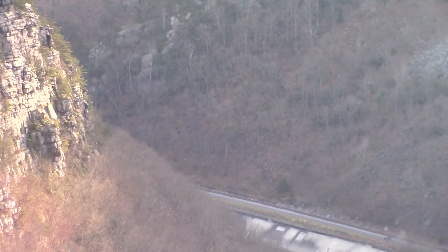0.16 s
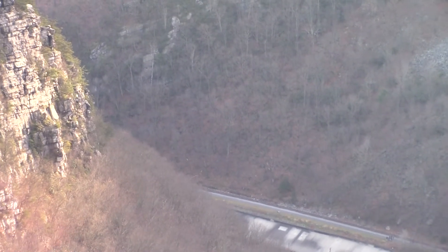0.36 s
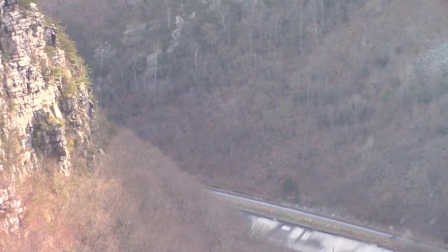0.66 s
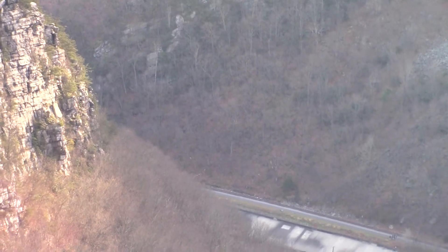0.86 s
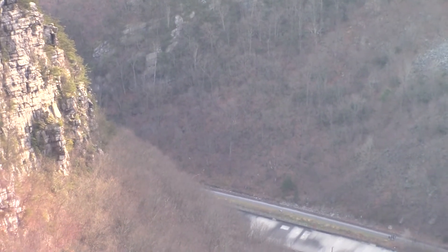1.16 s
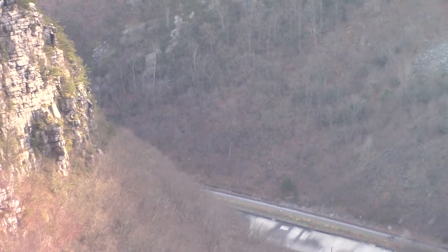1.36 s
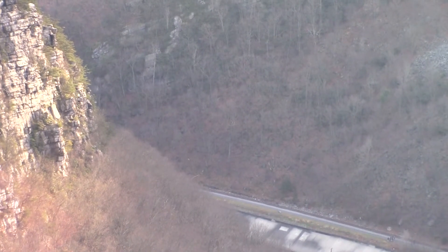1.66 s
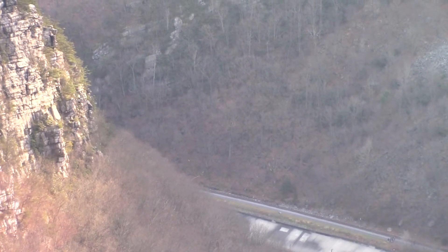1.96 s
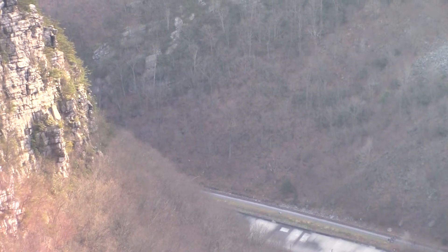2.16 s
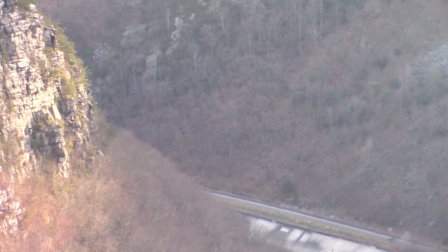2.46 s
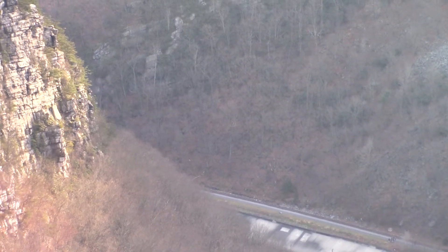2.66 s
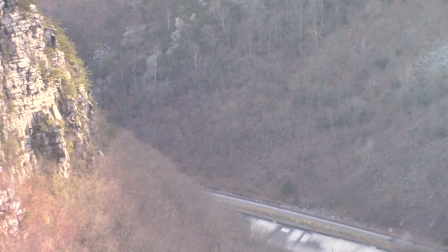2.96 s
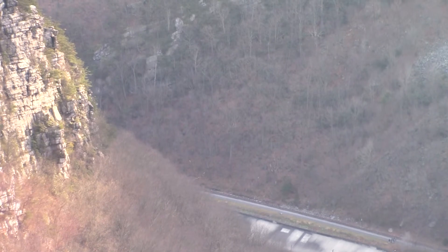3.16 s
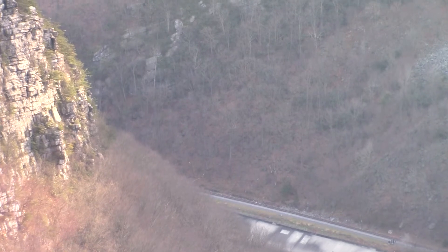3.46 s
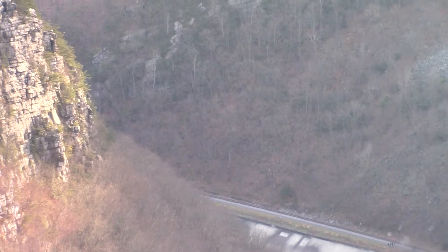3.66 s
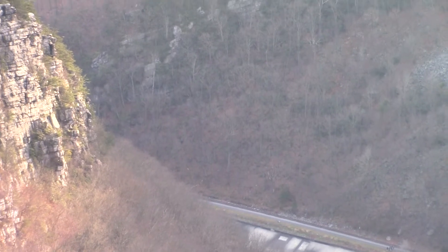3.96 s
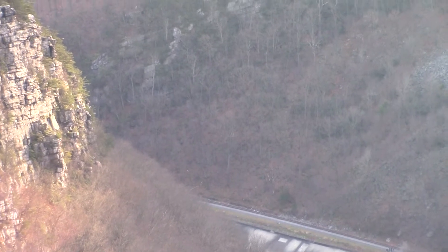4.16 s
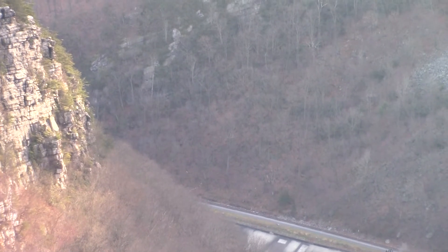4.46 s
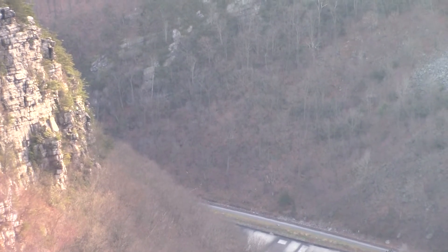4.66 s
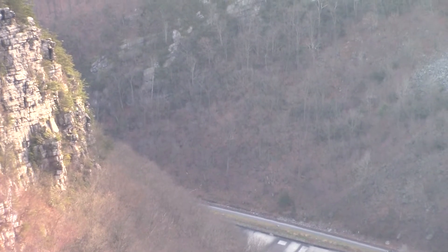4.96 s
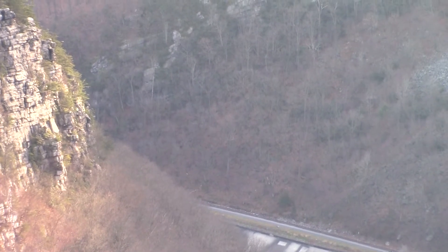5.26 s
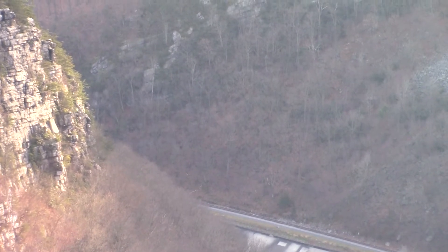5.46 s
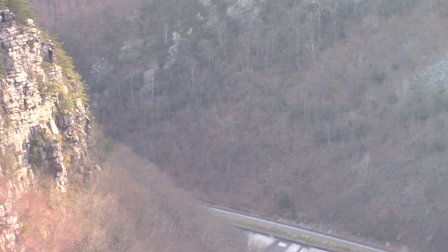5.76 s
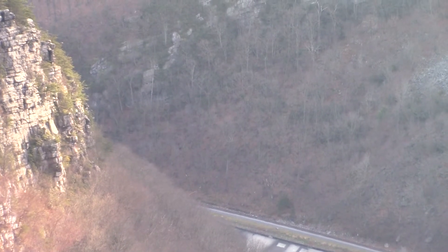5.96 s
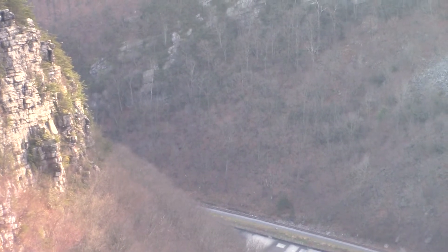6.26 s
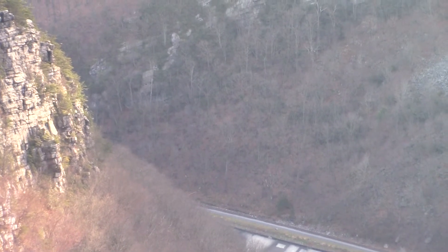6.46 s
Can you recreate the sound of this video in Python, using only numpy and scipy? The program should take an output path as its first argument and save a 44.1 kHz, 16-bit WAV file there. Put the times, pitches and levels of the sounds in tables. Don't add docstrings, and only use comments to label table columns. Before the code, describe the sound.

A steam locomotive whistle heard from far across a deep wooded valley. Low, broad river and traffic roar is present from the start, with faint preamp hiss and a very thin high whine. At about 0.1 s the whistle enters faintly on a low-mid note, climbs quickly from 0.6 to 1.3 s, and holds a full, hollow, mostly pure hoot with weak overtones, flickering as air moves. Deep wind thumps strike the microphone mainly from 1.9 to 2.6 s. The pitch sags from 3.4 s and the blast stops near 3.9 s. Late echoes at the higher pitch and a blurred reverberant haze carry through the gap, with a slight distant engine drone swelling near 4.2 s. At 4.9 s a second blast starts abruptly, glides up within half a second, and sustains, wavering, to the end at about 6.6 s, still sounding.

```python
import sys
import numpy as np
from scipy import signal
from scipy.fft import rfft, irfft, next_fast_len
from scipy.io import wavfile
from scipy.ndimage import uniform_filter1d, map_coordinates

SR = 44100
rng = np.random.default_rng(int(sys.argv[2]) if len(sys.argv) > 2 else 0)


def field_ratio(decibels):
    return 10 ** (np.asarray(decibels, dtype=float) / 20)


def waveform_to_disk(signal):
    frames = np.transpose(np.atleast_2d(signal))
    scaled = np.clip(frames, -1, 1) * 32767
    samples = np.round(scaled).astype(np.int16)
    wavfile.write(sys.argv[1], SR, samples)


N = 291940

# [t/s, pitch f/Hz, steam pressure level/dB]
FIRST_BLAST = [(0.12, 286, -23), (0.26, 292.5, -13.5), (0.58, 292, -14.5), (0.8, 316.6, -6),
               (1.25, 330.1, -1.5), (2.1, 342.3, 0.5), (2.9, 342.1, 0), (3.46, 331.7, -2),
               (3.79, 304.8, -10)]
SECOND_BLAST = [(4.91, 292.5, -19), (4.95, 299.2, -7.5), (5.0, 302.4, -7.5), (5.03, 321.8, -7),
                (5.36, 328.7, -1.5), (5.6, 333.9, -0.5), (5.801, 342.5, -1.5), (6.199, 341.7, -3),
                (6.61, 345, 1)]


def whistle(rows, wobble, scatter, dull_db, fade_s):
    # [multiple, level at full pressure/dB, pressure sensitivity/(dB/dB), twinkle/dB]
    pipe_partials = [(1, -18, 0.95, 0), (2, -36.5, 1.1, 2.5), (3, -33, 0.9, 2.5), (4, -41.5, 1.2, 2.1),
                     (5, -41, 0.99, 1.6), (6, -47.5, 0.87, 1.7), (7, -60, 0.37, 1.2), (8, -66.5, 0.3, 1),
                     (9, -76.5, .6, 2.7)]
    t = np.arange(N) / SR
    start_s, end_s = rows[0][0], rows[-1][0] + fade_s
    gate = np.clip(np.minimum(t - start_s, end_s - t) / fade_s, 0, 1)
    sounding = gate > 0
    size = np.sum(sounding)
    pitch_hz, pressure_db = (c[sounding] for c in in_time(rows))
    phase = 2 * np.pi * np.cumsum(pitch_hz * (1 + wobble * drift(13.1, size))) / SR
    partials = {}
    for k, full_db, follows, twinkle_db in pipe_partials:
        db = full_db + dull_db * np.log2(k) + follows * pressure_db + twinkle_db * drift(9.1, size)
        share = scatter * np.log(k)
        in_step = (1 + share * drift(17.2, size)) * np.sin(k * phase)
        out_of_step = share * drift(16, size) * np.cos(k * phase)
        wave = (in_step + out_of_step) / np.sqrt(0.5 + share ** 2)
        partials[k] = np.zeros(N)
        partials[k][sounding] = gate[sounding] * field_ratio(db) * wave
    return partials


def slope_echoes():
    # [t/s, pitch f/Hz, strength level/dB]
    echo_curve = [(3.3, 344.5, -7.5), (3.55, 348.9, -3.5), (3.9, 346.9, -2), (4.06, 343.7, -2),
                  (4.2, 338, -5), (4.42, 343.2, -7.5), (4.6, 336, -17.5), (4.95, 341.4, -11.5),
                  (5.4, 337.4, -16.5)]
    last_curve = [(3.8, 316, -17.5), (4.2, 320.7, -21.5), (4.38, 328, -14), (4.5, 322, -19.5),
                  (4.7, 326, -10.5), (4.85, 324, -12.5), (4.98, 316.2, -15)]
    echo = whistle(echo_curve, wobble=0.004, scatter=0.36, dull_db=-4.0, fade_s=0.18)
    last = whistle(last_curve, wobble=0.0066, scatter=0.58, dull_db=0.0, fade_s=0.2)
    return {k: echo[k] + last[k] for k in echo}


def rays(partials):
    # [t/s, level/dB, length/s]
    fundamental_rays = [(0.45, -4, .04), (0.666, 6.5, .05), (0.801, -8.5, 0.035), (1.003, -3.5, 0.046),
                        (1.203, 5.5, 0.15), (1.39, -5.5, 0.018), (1.537, -7.5, 0.031), (2.115, -12, 0.02),
                        (2.21, -7, 0.027), (2.332, 3, 0.046), (2.45, -19.5, 0.04), (2.6, 4, .1),
                        (2.831, -26.5, 0.074), (2.937, 6.5, .04), (3.183, -9, .03), (3.269, -15, .03),
                        (3.319, 6, .04), (3.937, -6.5, 0.053), (4.05, 6, .045), (4.146, -3.5, 0.024),
                        (4.556, -10.5, 0.066), (4.965, -11.5, 0.027), (5.09, -5, 0.051), (5.371, 2, 0.045),
                        (5.436, -5.5, .03), (5.669, -8, 0.026), (5.816, 5, 0.079), (6.14, -2.5, 0.09),
                        (6.35, -14, 0.043), (6.468, 1.5, 0.041)]
    # [t/s, multiple, level/dB, length/s]
    overtone_rays = [(1.271, 2, 5, 0.052), (1.8, 2, 4.5, 0.073), (2.533, 2, 8, 0.067), (2.77, 2, 9, .04),
                     (3.297, 2, 4.5, 0.12), (6.106, 2, 8.5, 0.048), (1.266, 3, 3.5, 0.065),
                     (2.376, 3, 3.5, 0.065), (2.8, 3, -8.5, 0.097), (2.934, 3, 8, 0.062),
                     (3.302, 3, 4.5, 0.1), (3.765, 3, 7, 0.039), (4.72, 3, 5.5, .06), (4.984, 3, 12.5, .05),
                     (5.406, 3, 1.5, 0.079), (6.301, 3, 5.5, .2), (2.65, 4, 4.5, .15),
                     (5.296, 4, 4.5, 0.21), (6.3, 4, 5.5, .3), (0.969, 5, 6.5, 0.086),
                     (1.748, 5, 5.5, 0.082), (2.706, 5, 3.5, .08), (3.204, 5, 4.5, 0.23),
                     (5.064, 5, 8, 0.046), (5.652, 5, 7, 0.12), (6.35, 5, -6, 0.093),
                     (2.298, 6, -1.5, 0.16), (3.3, 6, 5.5, 0.18), (5.45, 6, 1.5, 0.16),
                     (3.297, 7, 6.5, 0.23)]
    rows = [(s, 1, db, length_s) for s, db, length_s in fundamental_rays] + list(overtone_rays)
    out = {}
    for k, tone in partials.items():
        swells = [(s, db, length_s) for s, multiple, db, length_s in rows if multiple == k]
        out[k] = tone * field_ratio(bumps(swells))
    return out


def haze(partials, flat, sway_s):
    # [f/Hz, decay t60/s, level/dB, build-up/s]
    valley_tail = [(340, 15, -6, 0.54), (660, 7.1, -2.5, 0.25), (1000, 11, 2, 0.071),
                   (1710, 3.8, -6, 0.094), (2400, 2.6, -5.5, 0.039)]
    hz, t60_s, level_db, rise_s = np.transpose(valley_tail)
    t = np.arange(N) / SR
    coarse_s = t[::4]
    size, spectrum = next_fast_len(2 * len(coarse_s)), 0
    axis = np.log(hz)
    for k, tone in partials.items():
        at = np.log(k * hz[0])
        tail = rng.standard_normal(len(coarse_s)) * field_ratio(-60 * coarse_s / np.interp(at, axis, t60_s))
        tail = tail * (1 - np.exp(-(coarse_s / np.interp(at, axis, rise_s)) ** 2))
        tail = tail / np.sqrt(np.sum(tail ** 2)) * field_ratio(np.interp(at, axis, level_db))
        spectrum = spectrum + rfft(tone[::4], size) * rfft(tail, size)
    late_s = t * (1 - flat) + sway_s * drift(5.5)
    return map_coordinates(irfft(spectrum, size), [late_s * SR / 4], order=3, mode="nearest")


def gusts():
    # [t/s, level/dB, length/s]
    gust_events = [(0.034, -32, 0.062), (0.602, -33.5, 0.053), (0.966, -34, 0.033), (1.165, -41, 0.036),
                   (1.765, -35, 0.035), (1.885, -21, 0.078), (2.055, -8.5, 0.034), (2.2, -8.5, 0.053),
                   (2.28, -16.5, .04), (2.387, -11.5, 0.029), (2.523, -18, 0.039), (2.628, -25, 0.087),
                   (2.772, -25, 0.044), (2.921, -30.5, 0.073), (3.093, -27, 0.05), (3.41, -31, .05),
                   (3.947, -33, .05), (4.093, -25.5, 0.032), (4.231, -22, 0.063), (4.36, -27.5, .06),
                   (4.584, -27, 0.054), (5.088, -36.5, 0.06), (5.227, -33.5, .05), (5.484, -35, 0.065),
                   (5.776, -33.5, 0.056), (6.0, -39, .04), (6.501, -38.5, 0.094)]
    # [f/Hz, density level/dB]
    gust_colour = [(8, -22), (14, 8), (28, -1.5), (42, -8), (60, -11.5), (90, -19.5), (130, -41),
                   (200, -57)]
    breeze_db, breeze_swing_db, side_db = -44.5, 2, -33
    breeze = field_ratio(breeze_db + breeze_swing_db * drift(3.4))
    level = breeze + bumps([(s, field_ratio(db), length_s) for s, db, length_s in gust_events])
    mid, side = coloured(gust_colour), coloured(gust_colour)
    mid = mid / np.sqrt(uniform_filter1d(mid ** 2, size=SR // 10) + 0.42)
    return level * (mid + field_ratio(side_db) * side * [[1], [-1]])


def roar():
    # [f/Hz, density level/dB]
    roar_colour = [(40, 4), (100, -0.5), (250, 0), (500, -4), (800, -2), (1150, -7), (1500, -11.5),
                   (1900, -17), (2300, -23), (2900, -32), (3600, -43.5)]
    # [t/s, level/dB, length/s]
    traffic = [(0.2, 7.5, .8), (1.4, 0, 0.38), (2.9, -1.5, 0.37), (3.72, -1.5, .2), (4.2, 3, 0.28),
               (5.7, 2.5, 0.71)]
    roar_db, top_per_swell, top_per_pressure = -31.5, -0.086, 0.21
    swell_db = bumps(traffic)
    pressure_db = in_time(FIRST_BLAST + SECOND_BLAST)[1]
    noise = coloured(roar_colour)
    low, below_top = (signal.sosfiltfilt(signal.butter(2, hz, fs=SR, output="sos"), noise)
                      for hz in (640, 1350))
    middle = field_ratio(swell_db) * (below_top - low)
    top = field_ratio(top_per_swell * swell_db + top_per_pressure * pressure_db) * (noise - below_top)
    return field_ratio(roar_db + 1.2 * drift(2.1)) * (low + middle + top)


def engine_drone():
    # [f/Hz, width/Hz, level/dB]
    drone_bands = [(184.8, 7.5, -46.5)]
    # [t/s, level/dB, length/s]
    pull = [(4.15, 6, .3)]
    out = np.zeros(N)
    for hz, width_hz, db in drone_bands:
        edges_hz = [hz - width_hz / 2, hz + width_hz / 2]
        band = signal.butter(1, edges_hz, "band", fs=SR, output="sos")
        tone = rms_one(signal.sosfilt(band, rng.standard_normal(N)))
        out = out + field_ratio(db - 1.5 + bumps(pull) + 1.7 * drift(1.1)) * tone
    return out


def preamplifier():
    # [f/Hz, density level/dB]
    hiss_colour = [(2400, -7), (3300, -1.5), (4500, -2.5), (7000, -3.5), (10000, -4.5), (13000, -6),
                   (15700, -8)]
    # [f/Hz, level/dB]
    whine_lines = [(3085, -81), (3941, -85), (5562, -86), (7823, -85), (7882, -74), (11823, -88),
                   (15704, -90)]
    hiss_db, side_db = -58.5, -9
    t = np.arange(N) / SR
    mid, side = coloured(hiss_colour), coloured(hiss_colour)
    hiss = field_ratio(hiss_db) * (mid + field_ratio(side_db) * side * [[1], [-1]])
    whine = sum(np.sqrt(2) * field_ratio(db + 1.5 * drift(2.1)) * np.sin(2 * np.pi * hz * t)
                for hz, db in whine_lines)
    return hiss + whine


def rms_one(x):
    return x / np.sqrt(np.mean(x ** 2) + 1e-20)


def in_time(rows):
    s, *columns = np.transpose(rows)
    return [np.interp(np.arange(N) / SR, s, c) for c in columns]


def drift(rate_hz, size=N):
    r = np.exp(-80 * np.pi * rate_hz / SR)
    slow = signal.lfilter([1], [1, -2 * r, r * r], rng.standard_normal(N // 40 + 2002))[2000:]
    return np.interp(np.arange(size) / 40, np.arange(len(slow)), rms_one(slow))


def bumps(rows):
    t = np.arange(N // 40 + 1) * 40 / SR
    out = np.zeros(len(t))
    for s, height, length_s in rows:
        out = out + height * np.exp(-((t - s) / length_s) ** 2)
    return np.interp(np.arange(N) / SR, t, out)


def coloured(spectrum):
    hz = np.maximum(np.fft.rfftfreq(N, 1 / SR), 1)
    points = np.array(spectrum)
    shape_db = np.interp(np.log(hz), np.log(points[:, 0]), points[:, 1], left=-90, right=-90)
    return rms_one(irfft(rfft(rng.standard_normal(N)) * field_ratio(shape_db), N))


def scene():
    first = whistle(FIRST_BLAST, wobble=0.0017, scatter=0.48, dull_db=0.0, fade_s=0.1)
    second = whistle(SECOND_BLAST, wobble=0.0019, scatter=0.39, dull_db=1.3, fade_s=0.087)
    echoes = slope_echoes()
    voices = rays({k: first[k] + second[k] + echoes[k] for k in first})
    valley = haze(voices, flat=0.008, sway_s=0.00026)
    return sum(voices.values()) + valley + roar() + engine_drone() + gusts()


def roll_off(x):
    return signal.sosfilt(signal.butter(12, 15760, fs=SR, output="sos"), x)


def record(dry):
    mix = dry + preamplifier()
    return roll_off(mix)


dry = scene()
out = record(dry)
waveform_to_disk(out)
```